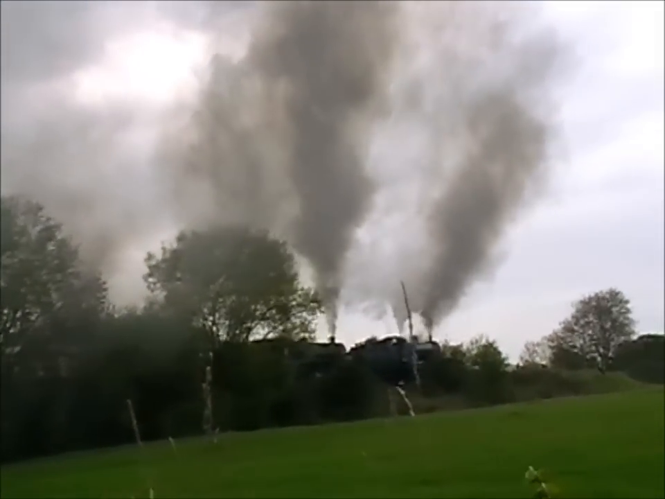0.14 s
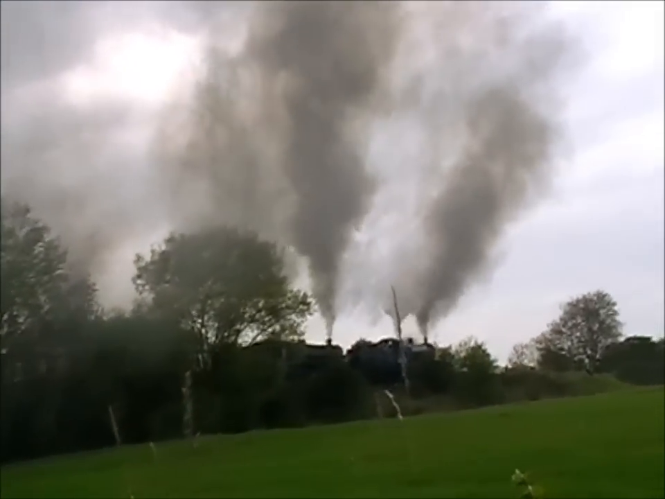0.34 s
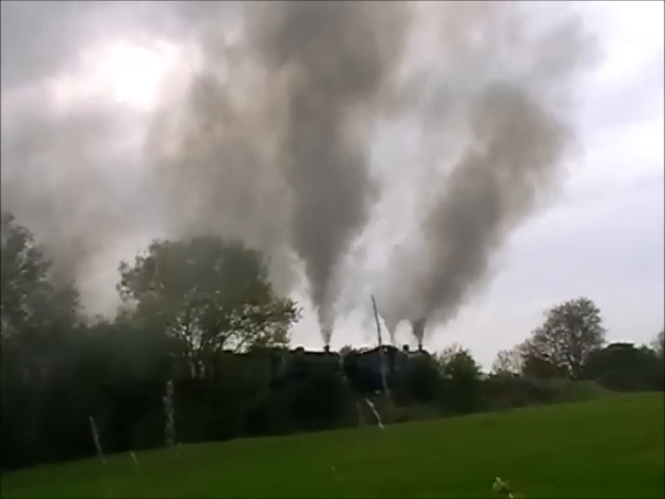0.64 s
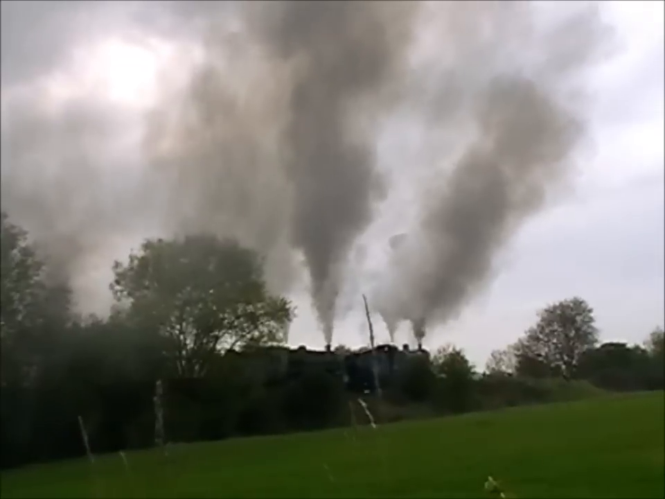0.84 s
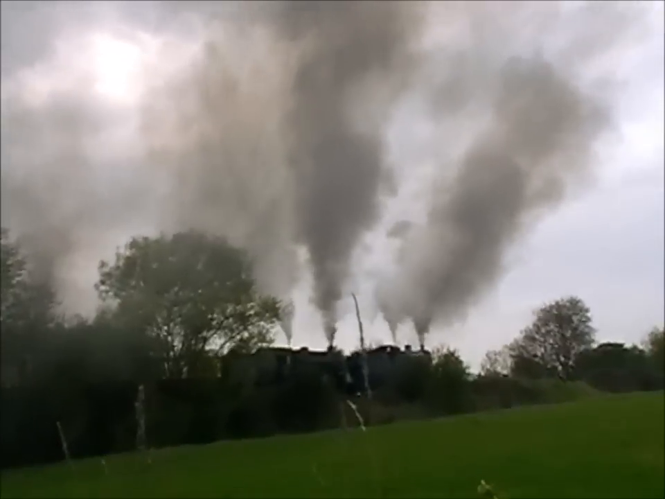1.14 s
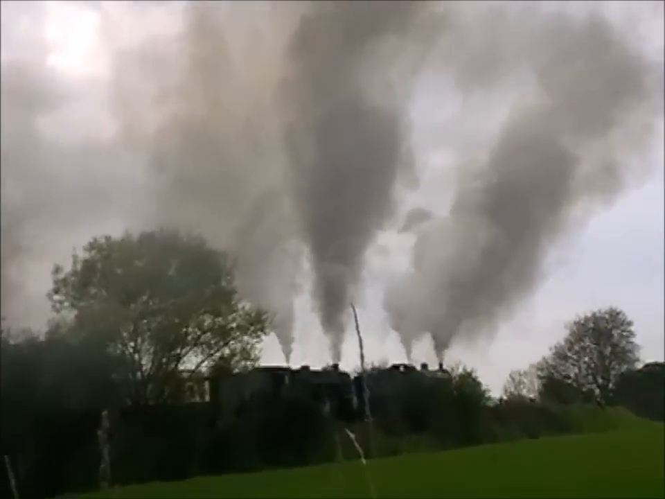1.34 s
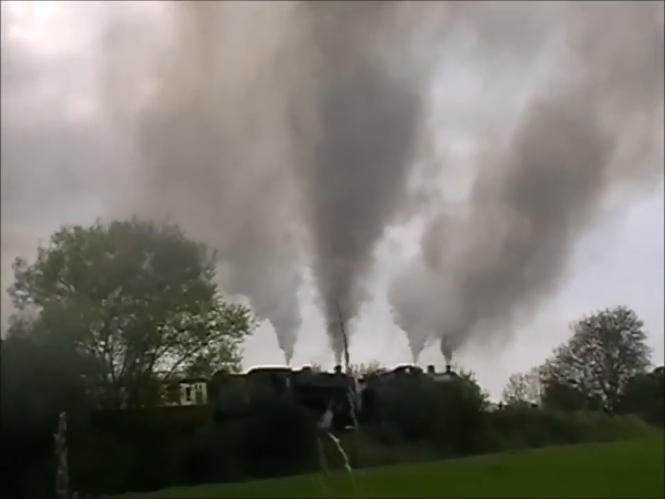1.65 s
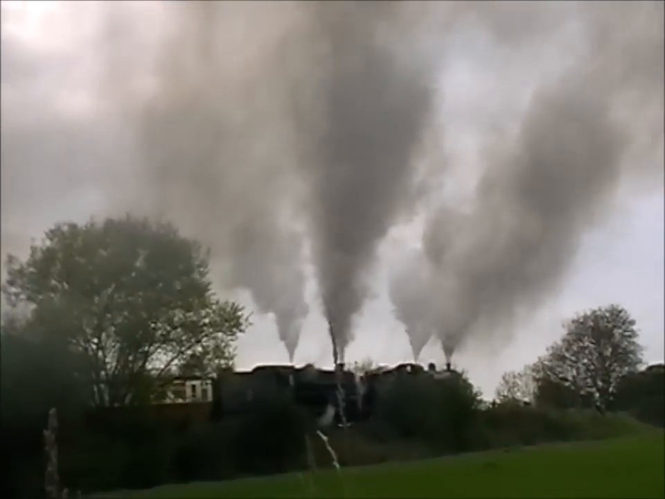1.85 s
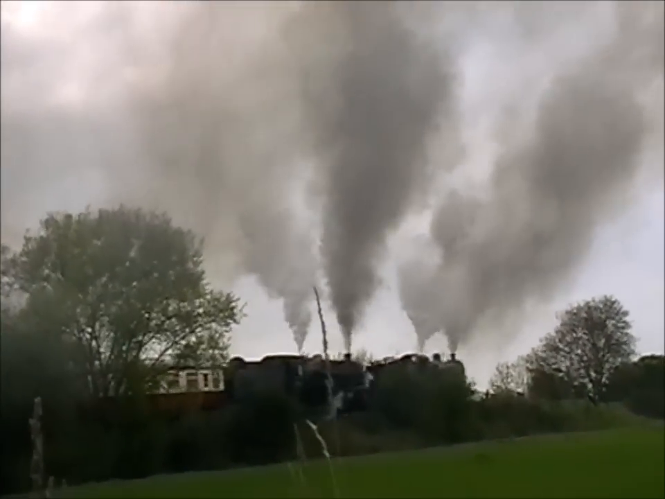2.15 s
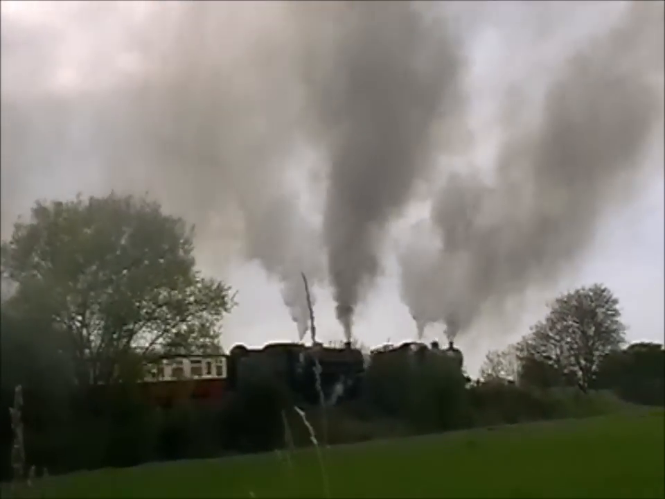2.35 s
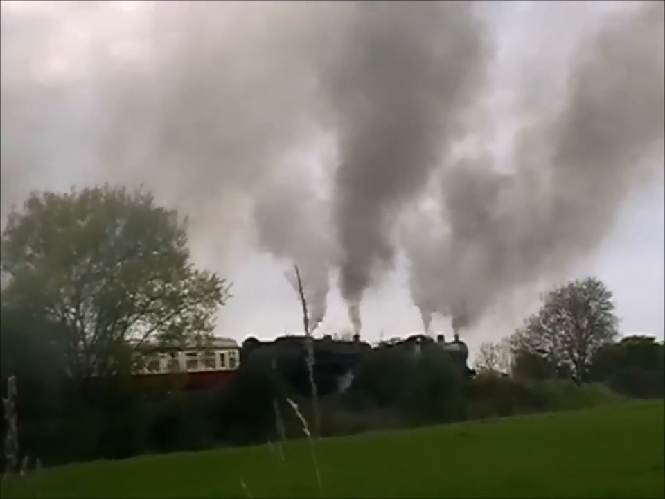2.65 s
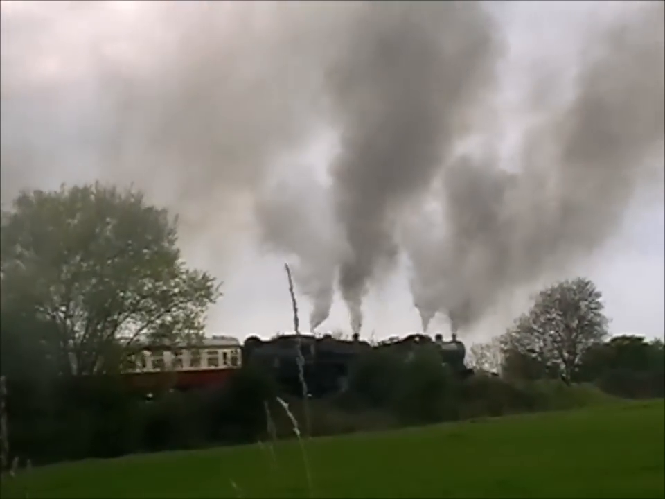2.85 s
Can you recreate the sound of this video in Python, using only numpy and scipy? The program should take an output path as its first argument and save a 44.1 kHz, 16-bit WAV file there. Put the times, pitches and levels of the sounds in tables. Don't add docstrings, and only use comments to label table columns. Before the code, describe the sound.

Steady, forceful steam engine chuffing runs throughout beside an open field, each gritty bark cutting off a rising hiss; fainter hollow puffs from another engine fill the gaps over rumbling wheels, close, nearly mono, slightly overloaded.

```python
import sys
import numpy as np
from scipy import signal
from scipy.fft import rfft, irfft
from scipy.io import wavfile
from scipy.ndimage import uniform_filter1d

SR = 44100
rng = np.random.default_rng(int(sys.argv[2]) if len(sys.argv) > 2 else 0)


def log_audio(samples):
    frames = np.atleast_2d(samples).T
    limited = np.clip(frames, -1, 1)
    pcm = np.round(limited * 32767).astype(np.int16)
    wavfile.write(sys.argv[1], SR, pcm)


def voltage_ratio(decibels):
    exponent = np.asarray(decibels, float) / 20
    return 10 ** exponent


N = 132300
HOP = 128
FRAME = dict(nperseg=4 * HOP, noverlap=3 * HOP)
T = np.arange(N // HOP + 6) * HOP / SR
HZ = np.fft.rfftfreq(4 * HOP, 1 / SR)[:, None]

# t/s, level/dB, chimney boom/dB, thump/dB, tilt/dB per octave
EXHAUST_BEATS = [(-.03, -14, -8.5, -12, -0.5), (0.223, -17.5, -6.5, -13, -2.5), (0.471, -17.5, -8, -26, 1),
                 (0.727, -14, -14, -10, 1), (0.957, -15.5, -4.5, -9, -2), (1.186, -17.5, -7, -16, 1),
                 (1.428, -17, -8, -35, -1.5), (1.678, -14, -12, -9.5, -2.5), (1.898, -14, -9, -13, -1),
                 (2.116, -15.5, -10, -11, -3), (2.352, -13, -17, -18, -1), (2.588, -12, -15.5, -11.5, 2.5),
                 (2.804, -13, -16.5, -14.5, 3)]
BEAT_RISE_S = 0.014
FAR_NOTCH_HZ, FAR_NOTCH_DB = 1550, -8


def evened(x):
    return x / np.sqrt(np.mean(x ** 2) + 1e-20)


def read(points, hz):
    f, value = np.transpose(points)
    return np.interp(np.log(hz + 1), np.log(f + 1), value)


def colour(db):
    return voltage_ratio(db) / np.sqrt(np.mean(voltage_ratio(db) ** 2))


def bump(hz, width_hz, at=HZ):
    return np.exp(-.5 * ((at - hz) / width_hz) ** 2)


def tilt(db_per_octave):
    return db_per_octave * np.log2((HZ + 100) / 2000)


def gate(t, rise, length, fall):
    opening = 1 + np.exp(np.clip(-4 * t / rise, -50, 50))
    closing = 1 + np.exp(np.clip(4 * (t - length) / fall - 2, -50, 50))
    return 1 / opening / closing


def steam(gains, patchy_db, flicker_db):
    a, b, patches = rng.standard_normal((len(T), len(HZ), 3)).T
    patches = uniform_filter1d(patches, size=5, axis=0)
    patches = evened(uniform_filter1d(patches, size=14, axis=1))
    flicker = uniform_filter1d(rng.standard_normal(a.shape[::-1]).T, size=90, axis=0)
    flicker = evened(uniform_filter1d(flicker, size=2, axis=1))
    z = a + 1j * b
    unit = np.sqrt(np.mean(signal.istft(z, **FRAME)[1] ** 2))
    z = z * gains * voltage_ratio(patchy_db * patches + flicker_db * flicker)
    return signal.istft(z, **FRAME)[1][:N] / unit


def leaks():
    # start/s, end/s, level/dB, growth/dB per s, tilt/dB per octave
    swells = [(-.1, 0.034, -33, 3, 6), (0.043, 0.243, -24.5, 24, 0.5), (0.287, 0.491, -21.5, 6, 3),
              (0.536, 0.738, -22, 31, 1.5), (0.827, 0.965, -24.5, 24, 1), (1.01, 1.19, -26, 3, -1.5),
              (1.283, 1.464, -28.5, -50, -1), (1.51, 1.687, -21.5, 35, -1.5),
              (1.777, 1.906, -20.5, 37, 0.5), (1.972, 2.13, -25, 14, -1), (2.207, 2.353, -23, 30, -3),
              (2.47, 2.59, -25.5, 42, -1), (2.754, 2.844, -23, 25, -2), (2.933, 3.1, -27, 15, -3.5)]
    # f/Hz, level/dB per Hz
    hiss = [(1500, -7), (2700, -4.5), (4300, 0), (6700, -3), (10200, -9.5), (12500, -13.5), (15300, -30)]
    # f/Hz, width/Hz, level/dB
    whistles = [(2586, 117, 9.5), (4400, 310, 1.5), (6130, 670, 1.5), (9500, 680, 4)]
    tone_db = read(hiss, HZ) + sum(db * bump(hz, width) for hz, width, db in whistles)
    tone_db = tone_db - 12 * np.log2(1500 / (HZ + 20)).clip(0)
    treble_early_s = 0.014 * np.log2((HZ + 100) / 6000)
    power = 0
    for start, end, db, grow_db, tilt_db in swells:
        level_db = db + grow_db * (T - end).clip(start - end, 0)
        opening = gate(T - start, 0.13, end - start - treble_early_s, 0.041)
        power = power + (colour(tone_db + tilt(tilt_db)) * voltage_ratio(level_db) * opening) ** 2
    return steam(np.sqrt(power), patchy_db=0.95, flicker_db=0.76)


def ground(hz):
    notches = -15 * bump(hz, 0.036 * hz) - 9 * bump(1.18 * hz, 0.036 * hz)
    crest = 2 * bump(0.7 * hz, 0.092 * hz)
    shelf = -4.5 / (1 + (hz / (HZ + 1)) ** 12)
    return notches + crest + shelf


def blasts():
    # f/Hz, level/dB per Hz
    blast = [(80, -51), (250, -10), (550, -1), (1000, -4), (1800, -4.5), (2500, -11), (4200, -13),
             (9000, -35), (15000, -56)]
    # f/Hz, T60/s
    blast_t60 = [(150, 1), (600, 0.72), (1500, 0.44), (5000, 0.51), (12000, 0.15)]
    # bark f/Hz, bark level/dB, first ground notch f/Hz
    barks = [(650, 5, 1500), (700, 0.5, 1410), (760, 1, 1370), (905, 8.5, 1600), (950, 2, 1420),
             (950, 1.5, 1540), (590, 6, 1400), (606, -1.5, 2150), (774, 2.5, 2200), (730, 0, 1610),
             (890, 6.5, 2080), (1040, 6.5, 2160), (905, 9.5, 2080)]
    punches = [5.6, 7.1, 2.9, 4.2, 3, 4.7, 6.9, 7.9, 5.5, 7, 7.8, 6.2, 7]
    bass_lead_s, punch_s, open_s, shut_s = 0.0011, 0.041, 0.088, 0.051
    punch_top_hz, sputter_db, sputter_s = 2500, .7, .004
    power = 0
    for beat, bark, punch_db in zip(EXHAUST_BEATS, barks, punches):
        s, db, _, _, tilt_db = beat
        bark_hz, bark_db, notch_hz = bark
        t = T - s - bass_lead_s * np.log2((HZ + 100) / 400).clip(0, 2.5)
        late = np.maximum(t - BEAT_RISE_S, 0)
        fade_db = punch_db / (1 + (HZ / punch_top_hz) ** 2) * (np.exp(-(late / punch_s) ** 2) - 1)
        fade_db = fade_db - 60 * late / read(blast_t60, HZ)
        stretch = 1 + 0.024 * s
        tone_db = read(blast, HZ / stretch) + tilt(tilt_db)
        tone_db = tone_db + bark_db * bump(bark_hz, 0.15 * bark_hz) + ground(notch_hz)
        opening = gate(t - BEAT_RISE_S / 2, BEAT_RISE_S, open_s, shut_s)
        power = power + (colour(tone_db) * voltage_ratio(db + fade_db) * opening) ** 2
    slow = bump(0, 0.31 / sputter_s, np.fft.rfftfreq(N, 1 / SR))
    sputter = evened(irfft(rfft(rng.standard_normal(N)) * slow, N))
    return steam(np.sqrt(power), patchy_db=2.5, flicker_db=.8) * voltage_ratio(sputter_db * sputter)


def chimney():
    boom_hz, boom_width_hz, boom_t60, thump_hz, thump_s = 196.2, 57, 0.46, 117, 0.0051
    t = np.arange(N) / SR
    r = np.exp(-np.pi * boom_width_hz / SR)
    hum = rng.standard_normal(N) * np.exp(-2j * np.pi * boom_hz * t)
    hum = signal.lfilter([1], np.poly([r, r]), hum)
    hum = evened((hum * np.exp(2j * np.pi * boom_hz * t)).real)
    out = np.zeros(N)
    for s, db, boom_db, thump_db, _ in EXHAUST_BEATS:
        u = t - s
        ring = voltage_ratio(db + boom_db - 60 * np.maximum(u, 0) / boom_t60)
        out += ring * gate(u - BEAT_RISE_S / 2, BEAT_RISE_S, 1, 1) * hum
        push = np.exp(-.5 * ((u - .008) / thump_s) ** 2)
        out += voltage_ratio(db + thump_db - 2.5) * push * np.sin(2 * np.pi * thump_hz * u)
    return out


def roar():
    # f/Hz, level/dB per Hz
    rumble = [(30, -30), (70, -10), (200, -5.5), (300, -9.5), (600, -1), (2400, -8), (6000, -13),
              (10000, -21.5), (15300, -39)]
    # t/s, level/dB
    swell = [
        (0, -25),
        (.6, -26.5),
        (1.2, -29),
        (1.8, -24.5),
        (2.4, -31.5),
        (2.7, -30),
        (3, -28.5),
    ]
    level_db = np.interp(T, *np.transpose(swell)) + FAR_NOTCH_DB * bump(FAR_NOTCH_HZ, 117)
    return steam(colour(read(rumble, HZ)) * voltage_ratio(level_db), patchy_db=1.5, flicker_db=-0.15)


def puffs():
    # t/s, level/dB, length/s, throat f/Hz, throat level/dB
    far_beats = [(0.106, -21, 0.047, 1890, 9), (0.333, -25, 0.044, 1890, 13), (0.68, -27.5, 0.086, 990, 8),
                 (0.92, -24.5, 0.087, 1800, 5), (1.132, -21.5, 0.078, 950, 4),
                 (1.344, -23.5, 0.095, 1850, 1), (1.56, -28, 0.043, 1920, 12),
                 (1.765, -25.5, 0.038, 1840, 11), (2.047, -30, 0.14, 1020, 6),
                 (2.301, -28.5, 0.13, 1000, 1), (2.553, -25.5, 0.051, 700, 3),
                 (2.948, -28.5, .07, 1090, 18)]
    # f/Hz, level/dB per Hz
    soft_steam = [(100, -9), (280, -11.5), (550, -2.5), (1200, -4.5), (2400, -10.5), (4500, -15),
                  (9400, -22.5), (15000, -42)]
    rise_s, fall_s, throat_width_hz = .03, .03, 170
    power = 0
    for s, db, length, hz, throat_db in far_beats:
        tone_db = read(soft_steam, HZ) + throat_db * bump(hz, throat_width_hz)
        power = power + (colour(tone_db) * voltage_ratio(db) * gate(T - s, rise_s, length, fall_s)) ** 2
    notch = voltage_ratio(FAR_NOTCH_DB * bump(FAR_NOTCH_HZ, 160))
    return steam(np.sqrt(power) * notch, patchy_db=5, flicker_db=-1.5)


def scene():
    # f/Hz, side minus mid level/dB
    spread = [(30, -8), (110, -12), (250, -19), (1200, -20), (2800, -17), (4300, -26), (6400, -15.5),
              (8500, -23)]
    # f/Hz, left minus right level/dB
    balance = [(60, 1.6), (200, 1.8), (400, 1), (800, .6), (1300, 0), (2400, -.6), (4000, 0), (15000, 0)]
    mid = rfft(leaks() + blasts() + chimney() + roar() + puffs())
    hz = np.fft.rfftfreq(N, 1 / SR)
    smear_t = np.arange(12000) / SR
    smear = rng.standard_normal(len(smear_t)) * np.exp(-smear_t / 0.051)
    side = mid * rfft(smear / np.linalg.norm(smear), N) * voltage_ratio(read(spread, hz))
    lean = voltage_ratio(read(balance, hz) / 2)
    return np.array([irfft((mid + side) * lean, N), irfft((mid - side) / lean, N)])


def band_limit(x):
    return signal.sosfilt(signal.butter(12, 15440, fs=SR, output="sos"), x)


def record(dry):
    ceiling = .7
    x = signal.sosfilt(signal.butter(4, 59, "high", fs=SR, output="sos"), dry)
    return band_limit(ceiling * np.tanh(x / ceiling))


dry = scene()
out = record(dry)
log_audio(out)
```